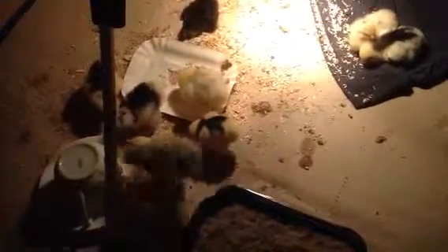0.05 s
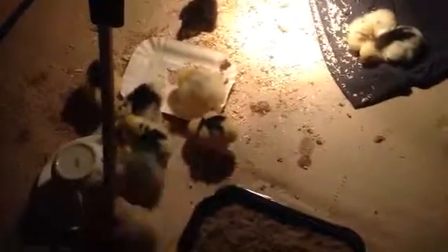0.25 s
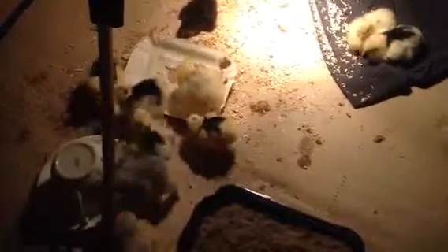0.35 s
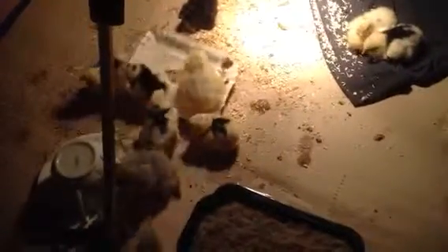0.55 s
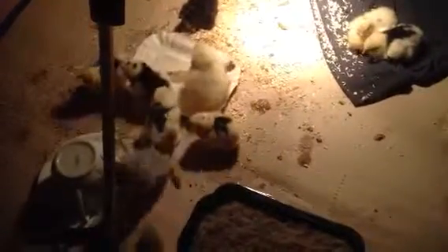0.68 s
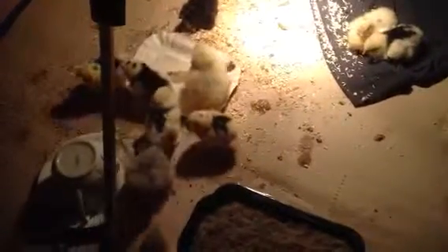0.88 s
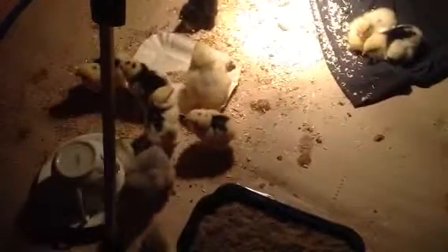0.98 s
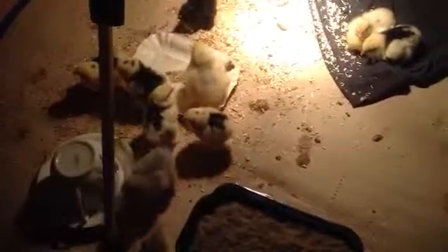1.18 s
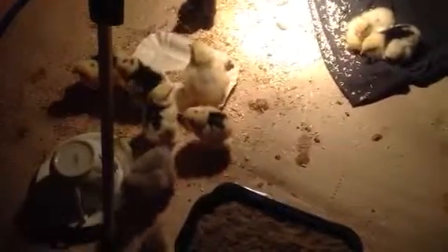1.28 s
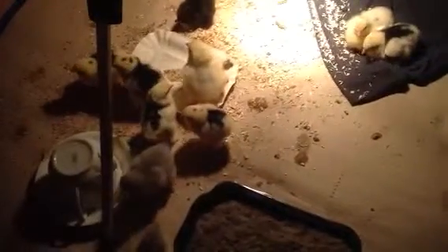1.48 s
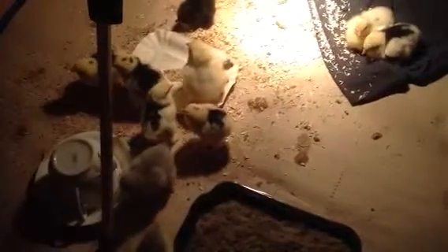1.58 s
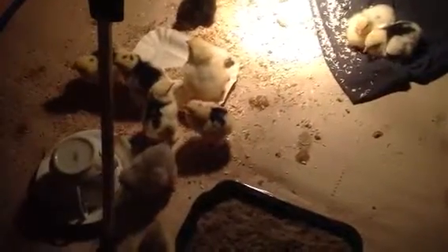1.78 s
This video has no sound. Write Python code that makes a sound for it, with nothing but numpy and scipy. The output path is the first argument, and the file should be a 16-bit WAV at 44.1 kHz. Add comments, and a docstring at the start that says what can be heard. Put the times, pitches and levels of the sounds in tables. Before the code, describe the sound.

Chicks' wings and feet rustle in crunchy litter, with a brief startled squeak and a thump near the start. The flurry settles into scattered ticks and pecks, then three soft, falling peeps, over faint hum in a small room.

```python
"""Chicks scuffling in litter

In a small room, a chick gives a startled squeak, a diving tone that breaks into a rasp, and lands with
a thump. Wings and feet scuffle through the litter, flick crumbs about and settle into single steps and
pecks: clusters of tiny grains over the hollow knock of the floor. Three soft, falling peeps follow.
Mains hum and faint room noise lie underneath."""
import sys
import numpy as np
from scipy import signal
from scipy.fft import rfft, irfft
from scipy.io import wavfile

SR = 44100
rng = np.random.default_rng(int(sys.argv[2]) if len(sys.argv) > 2 else 0)


def generate_wav(sig):
    """Save sig (samples, or channels by samples) to the path in sys.argv[1] as 16-bit PCM at SR."""
    pcm = np.round(np.clip(np.atleast_2d(sig).T, -1, 1) * 32767).astype(np.int16)
    wavfile.write(sys.argv[1], SR, pcm)


N = 81585
T = np.arange(N) / SR

# The litter's midrange crunch. Each row: frequency in Hz, relative level in dB.
CRUNCH_SPECTRUM = [(60, -71), (300, -26), (1000, -3.5), (1500, -3.5), (1800, 0), (2400, -2.5), (3100, 0),
                   (3800, -3), (5000, -8.5), (7000, -15.5), (15000, -17)]
# The litter's fine, bright grit. Each row: frequency in Hz, relative level in dB.
GRIT_SPECTRUM = [(1000, -38), (3500, -7.5), (5500, -3.5), (7500, -4), (11000, -4.5), (13000, -0.5),
                 (15500, 2.5)]


def squeak():
    """A startled chick's thin, high note drops by nearly an octave and breaks into a rasp."""
    # Each row: time in seconds, then the levels of the tone, its octave and the rasp in dB.
    envelopes = [(.234, -63, -93, -73), (0.2429, -42, -83, -55), (0.242, -38, -45, -45),
                 (0.251, -36.5, -79, -66), (0.2538, -49, -64, -80), (.259, -35, -52, -41),
                 (0.264, -33.5, -47, -36), (0.273, -36.5, -35.5, -63), (.276, -62, -44, -26),
                 (.278, -38, -72, -54), (0.282, -35, -67, -33.5), (0.286, -55, -70, -62)]
    # Each row: time in seconds, pitch in Hz.
    pitch_curve = [(.234, 4500), (.243, 4830), (.25, 4720), (.2535, 4300), (.259, 3600), (.265, 2930),
                   (.269, 2760), (.273, 2700), (.277, 2800), (.283, 3080)]
    # The colour of the rasp. Each row: frequency in Hz, relative level in dB.
    rasp_spectrum = [(100, -69), (400, -54), (1000, 8.5), (1800, 12.5), (3000, 5.5), (4300, -5),
                     (6000, -39), (12000, -84)]
    times, *levels_db = np.transpose(envelopes)
    tone, octave, rasp = (np.interp(T, times, amp(db), 0, 0) for db in levels_db)
    jitter = 1 + 0.0213 * wander(hz=680)
    pitch_hz = np.interp(T, *np.transpose(pitch_curve)) * jitter
    phase = 2 * np.pi * np.cumsum(pitch_hz) / SR
    overtones = np.sin(2 * phase) + amp(-16) * np.sin(3 * phase)
    voice = tone * np.sin(phase) + octave * overtones
    return np.sqrt(2) * voice + rasp * ring(rng.standard_normal(N), click(rasp_spectrum))


def peeps():
    """A chick's soft, nearly pure notes slide down ever faster, with a slight quiver."""
    # Each row: start in seconds, length in seconds, first and last pitch in Hz, level in dB.
    notes = [(1.546, 0.015, 3250, 2820, -56), (1.646, 0.042, 3825, 2975, -49.5),
             (1.829, 0.03, 3880, 3200, -59)]
    bend, softness = 1.65, 0.96
    out = np.zeros(N)
    for start, length, first_hz, last_hz, db in notes:
        progress = np.arange(0, 1, 1 / (length * SR))
        glide_hz = first_hz + (last_hz - first_hz) * progress ** bend
        jitter = 1 + 0.008 * wander(hz=300)[:len(progress)]
        wobble_db = 4 * wander(hz=110)[:len(progress)]
        envelope = amp(db + wobble_db) * abs(np.sin(np.pi * progress)) ** softness
        phase = 2 * np.pi * np.cumsum(glide_hz * jitter) / SR
        add(out, start, envelope * np.sqrt(2) * np.sin(phase))
    return out


def steps_and_pecks():
    """Each foot or beak gives the floor one knock and crushes the litter under it."""
    # Each row: start in seconds, crunch level in dB, knock (before its trim) and grit in dB relative
    # to the crunch, decay in seconds, knock pitch in Hz.
    contacts = [(0.016, -56, 5.5, 10.5, 0.0057, 710), (0.052, -56.5, -6, 9, 0.01, 764),
                (0.082, -53, 2, -11, 0.012, 730), (.102, -61, -6, 7, 0.0012, 720),
                (.123, -49.5, 0.5, -1, 0.011, 694), (.277, -36, 1, -17, 0.0062, 590),
                (0.2886, -33.5, 3.5, -7, 0.0046, 503), (0.293, -28.5, 5, -29, 0.0021, 497),
                (0.357, -38, 2.5, -14, 0.0034, 910), (0.377, -46.5, 13, -4, 0.0046, 850),
                (.402, -49.5, 14, 2, 0.0067, 754), (0.435, -51.5, 13, 3, 0.0046, 595),
                (0.4574, -47, 13, 2, 0.0033, 618), (.486, -41, 8, -5, 0.0061, 503),
                (.493, -43.5, -3, -13, 0.0024, 600), (.514, -41.5, 2, -2, 0.0043, 730),
                (.5305, -40.5, 0, -7, 0.005, 770), (.536, -37, -1.5, -4, 0.0064, 694),
                (0.557, -40, -16, -15, 0.0033, 724), (0.66, -54.5, 10, -8, 0.0034, 395),
                (0.6852, -44.5, -11, 6, .003, 827), (.793, -59.5, 1.5, 10.5, 0.0052, 800),
                (0.863, -56.5, 0, 5, 0.004, 845), (.8752, -45.5, 0, -7, 0.0024, 780),
                (.8787, -43.5, 1, -13, 0.0051, 710), (.884, -47, 3, 0.5, 0.0033, 800),
                (1.2476, -44, -21, -2, 0.0029, 900), (1.2495, -41, 6, 9, 0.00067, 880),
                (1.286, -58, 6, 5.5, .003, 905)]
    knock_trim_db = -5
    crunch, grit = on_floor(click(CRUNCH_SPECTRUM)), click(GRIT_SPECTRUM)
    out = np.zeros(N)
    for start, db, knock_db, grit_db, decay_s, hz in contacts:
        knock_gain = amp(db + knock_db + knock_trim_db) * np.sqrt(decay_s * SR)
        add(out, start, knock_gain * floor_knock(hz))
        add(out, start, grain_burst(crunch, db, decay_s))
        add(out, start, grain_burst(grit, db + grit_db, decay_s))
    return out


def scuffle():
    """Wings and feet sweep the litter in uneven spurts, and the floor rumbles under them."""
    # Each row: time in seconds, then the levels of rumble, crunch and grit in dB before their trims.
    envelopes = [(0, -75, -67, -72), (0.024, -47.5, -46.5, -55), (.085, -64.5, -51, -56.5),
                 (.115, -62, -61.5, -61.5), (.19, -55, -50, -59), (.235, -47.5, -44, -48.5),
                 (.275, -53.5, -44.5, -50), (.3, -29, -27, -46), (.322, -52, -39.5, -43),
                 (.35, -39, -32.5, -41.5), (.39, -41.5, -35.5, -47), (.43, -46, -41, -51.5),
                 (0.468, -48, -37.5, -52.5), (0.498, -41, -34.5, -39.5), (.545, -45, -37, -49.5),
                 (.6, -52, -40, -53.5), (0.668, -51, -40.5, -50), (.72, -75, -47.5, -66),
                 (.775, -81, -53, -68), (.81, -55, -56.5, -59), (.85, -68, -52.5, -66),
                 (.91, -54.5, -53, -70), (1.02, -72, -57.5, -66), (1.15, -81, -62.5, -74),
                 (1.4, -75, -64.5, -82)]
    times, *levels_db = np.transpose(envelopes)
    bodies = floor_knock(hz=621), on_floor(click(CRUNCH_SPECTRUM)), click(GRIT_SPECTRUM)
    trims_db = -6.5, -10, 1.5
    spurts = amp(1.58 * wander(hz=60))  # all three layers flutter together
    out = np.zeros(N)
    for level_db, body, trim_db in zip(levels_db, bodies, trims_db):
        contacts = grains(per_s=4000, size=N)
        flicker_db = 1.5 * wander(hz=86)
        envelope = spurts * amp(np.interp(T, times, level_db) + trim_db + flicker_db)
        out += ring(contacts * envelope, body)
    return out


def crumbs():
    """Crumbs of litter, flicked across the floor, land with light, dry ticks."""
    # Each row: start in seconds, level in dB before the trim, pitch in Hz.
    landings = [(0.64, -39, 3020), (.715, -51, 2500), (0.7433, -44.5, 2440), (0.793, -45.5, 2670),
                (.817, -50.5, 2600), (0.902, -53, 2700), (.928, -52, 2760), (0.944, -46.5, 2460),
                (.966, -52, 2430), (1.006, -54.5, 2357), (1.014, -56, 2600), (1.069, -56, 2690),
                (1.081, -58.5, 2680)]
    # The colour of a tick. Each row: multiple of its pitch, relative level in dB.
    tick_spectrum = [(.05, -34), (.3, -7.5), (.6, -4.5), (.85, 0), (1, 4), (1.2, -6.5), (1.6, -11),
                     (2.2, -15.5), (6, -33)]
    trim_db = -4
    out = np.zeros(N)
    for start, db, hz in landings:
        tick = click([(hz * multiple, level) for multiple, level in tick_spectrum])
        add(out, start, grain_burst(tick, db + trim_db, decay_s=0.0032))
    return out


def grain_burst(body, db, decay_s):
    """A quick, dying cluster of grains, each sounding the same body."""
    t = T[:SR // 8]
    rise_s = 0.0002
    force = np.minimum(t / rise_s, 1) * np.exp(-t / decay_s)
    burst = ring(force * grains(per_s=9700, size=len(t)), body)
    return amp(db) * np.sqrt(decay_s * SR) * burst / (np.linalg.norm(burst) + 1e-12)


def grains(per_s, size):
    """Tiny contacts of litter, random in timing, sign and strength."""
    strength_db = 2 * np.minimum(rng.exponential(1, size), 4)
    sign = rng.choice([-1, 1], size)
    hits = rng.random(size) < per_s / SR
    return unit(amp(strength_db) * sign * hits)


def floor_knock(hz):
    """The dull, hollow push of a touch, lower for a soft foot than for a beak."""
    # Each row: multiple of the knock's pitch, relative level in dB.
    knock_spectrum = [(.06, -76), (.25, -15), (.55, -11), (.8, -7.5), (1, 3), (1.25, -5.5), (1.9, -12.5),
                      (3.3, -23.5), (8, -43.5)]
    return on_floor(click([(hz * multiple, db) for multiple, db in knock_spectrum]))


def on_floor(touch):
    """A touch sets the floor's short modes ringing; the result has an energy of one."""
    # Each row: frequency in Hz, resonance in dB relative to the touch, seconds to die away by 60 dB.
    floor_modes = [(450, 3, 0.027), (682, -19, 0.023), (723, -9, 0.027), (826, -5.5, 0.098),
                   (903, 0, 0.017), (1321, -0.5, 0.12), (1860, -17, 0.088), (2170, -6, 0.01),
                   (2460, -8, 0.015), (3014, -4, 0.062)]
    t = T[:SR // 10]
    modes = np.zeros(len(t))
    for hz, db, t60 in floor_modes:
        unity_peak = 2 * np.log(1000) / (t60 * SR)
        modes += unity_peak * amp(db - 60 * t / t60) * np.cos(2 * np.pi * hz * t)
    sound = ring(modes, touch)
    add(sound, 0, touch)
    return sound / np.linalg.norm(sound)


def room(dry, wet_db):
    """The small room adds a dense tail, each band dying at its own speed."""
    # Each row: frequency in Hz, seconds to die away by 60 dB.
    reverb_times = [(200, 0.98), (1000, 0.39), (3000, 0.48), (8000, 0.37), (15000, 0.4)]
    build_up_s = 0.0024
    hz, t, noise = signal.stft(rng.standard_normal(SR // 2), SR, nperseg=256)
    decay = amp(-60 * t / curve_at(reverb_times, hz)[:, None])
    tail = signal.istft(noise * decay, SR, nperseg=256)[1]
    tail *= np.minimum(T[:len(tail)] / build_up_s, 1)
    return dry + amp(wet_db) * ring(dry, tail / np.linalg.norm(tail))


def mains_hum():
    """A low, steady mains hum with a fainter drone above it."""
    # Each row: frequency in Hz, level in dB.
    tones = [(100, -67.5), (164, -80.5)]
    return sum(amp(db) * np.sqrt(2) * np.sin(2 * np.pi * (hz * T + rng.random())) for hz, db in tones)


def room_noise():
    """Faint, steady air: a low murmur under a thin hiss."""
    # Each row: frequency in Hz, relative level in dB.
    air_spectrum = [(30, -20), (75, -16), (105, -3), (150, 3), (250, -1.5), (400, -6), (600, -11.5),
                    (1200, -18), (3000, -20.5), (7000, -18.5), (15500, -21.5)]
    colour = amp(curve_at(air_spectrum, np.fft.rfftfreq(N, 1 / SR)))
    return amp(-63) * unit(irfft(rfft(rng.standard_normal(N)) * colour, N))


def click(spectrum, size=4096):
    """The shortest causal click with this spectrum (minimum phase), at an energy of one."""
    log_gain = np.log(amp(curve_at(spectrum, abs(np.fft.fftfreq(size, 1 / SR)))))
    response = np.exp(np.conj(signal.hilbert(log_gain)))
    pulse = np.fft.ifft(response).real[:size // 2]
    return pulse / np.linalg.norm(pulse)


def wander(hz):
    """Smooth random movement up to about this rate, at an rms of one."""
    rolloff = 1 + (np.fft.rfftfreq(N, 1 / SR) / hz) ** 4
    return unit(irfft(rfft(rng.standard_normal(N)) / rolloff, N))


def curve_at(points, hz):
    """Reads a table's curve on a log-frequency axis."""
    frequencies, values = np.transpose(points)
    return np.interp(np.log(hz + 1), np.log(frequencies + 1), values)


def ring(drive, response):
    """Plays a signal through an impulse response, keeping its length."""
    return signal.fftconvolve(drive, response)[:len(drive)]


def add(mix, start_s, sound):
    """Lays a sound into the mix, in place."""
    part = mix[max(round(start_s * SR), 0):][:len(sound)]
    part += sound[:len(part)]


def amp(db):
    """Turns decibels into a gain."""
    return 10 ** (np.asarray(db) / 20)


def unit(x):
    """Scales to an rms of one."""
    return x / np.sqrt(np.mean(x ** 2) + 1e-20)


def scene():
    """Litter sounds and chick voices in the room, over hum and air, in mono."""
    litter = room(steps_and_pecks() + crumbs(), wet_db=-7.5) + room(scuffle(), wet_db=-13)
    voices = room(squeak(), wet_db=-8) + room(peeps(), wet_db=-5)
    return (litter + voices + mains_hum() + room_noise())[None]


def record(dry):
    """The microphone sheds the deepest bass, and a steep filter takes off the very top."""
    low_cut_hz, high_cut_hz = 12, 15450
    low_cut = signal.butter(2, low_cut_hz, "high", fs=SR, output="sos")
    high_cut = signal.firwin(511, high_cut_hz, window=("kaiser", 9), fs=SR)
    return signal.oaconvolve(signal.sosfilt(low_cut, dry), high_cut[None], "same")


dry = scene()
out = record(dry)
generate_wav(out)
```